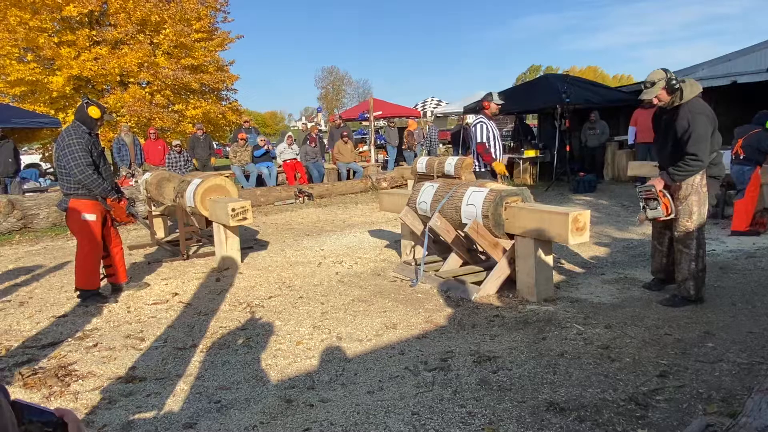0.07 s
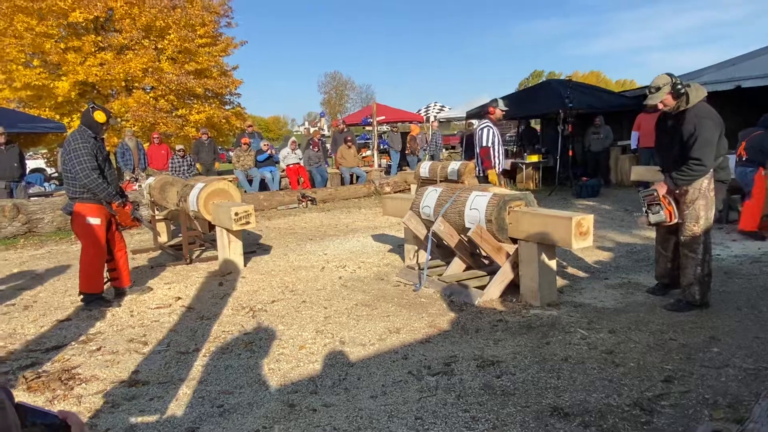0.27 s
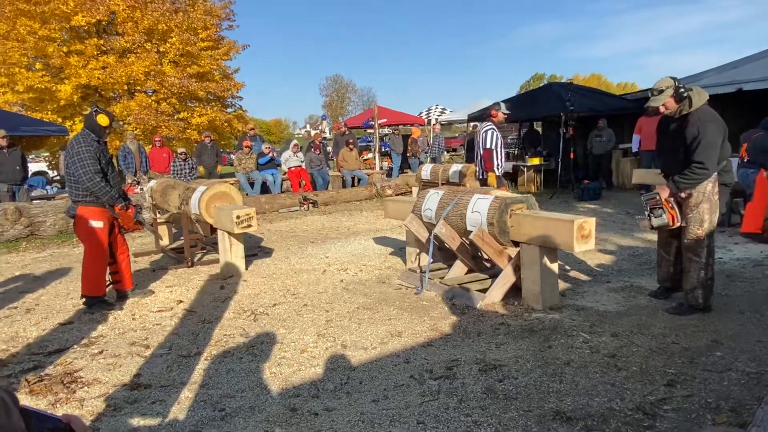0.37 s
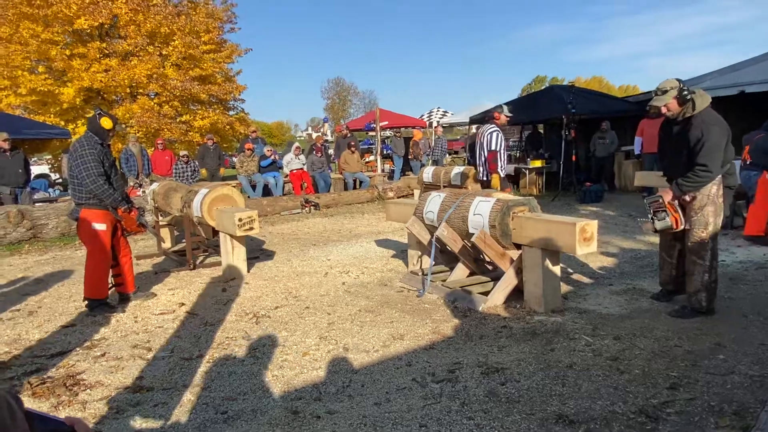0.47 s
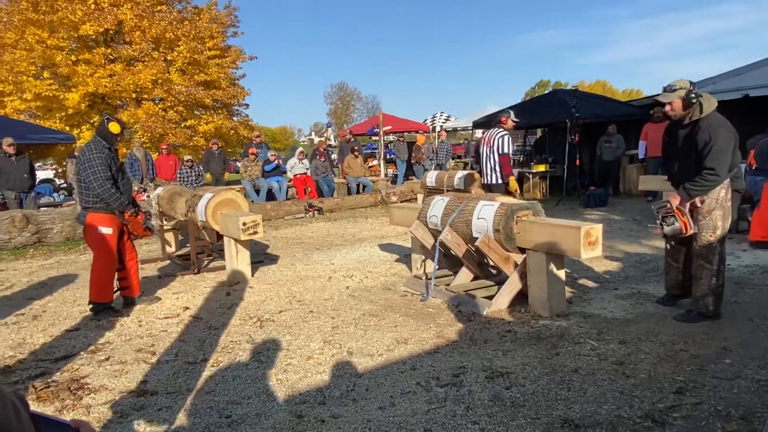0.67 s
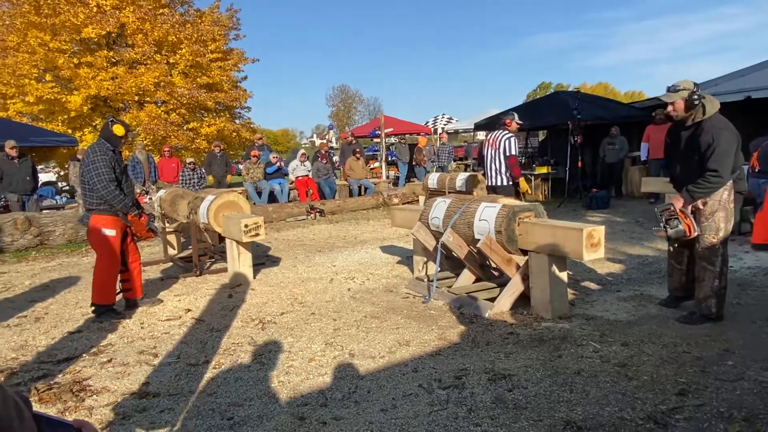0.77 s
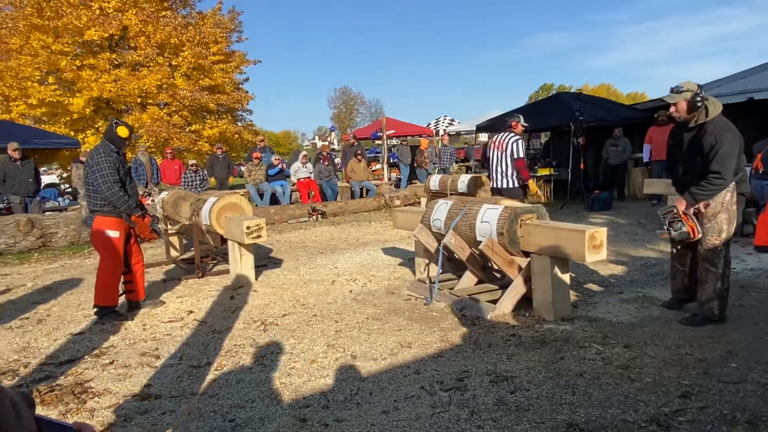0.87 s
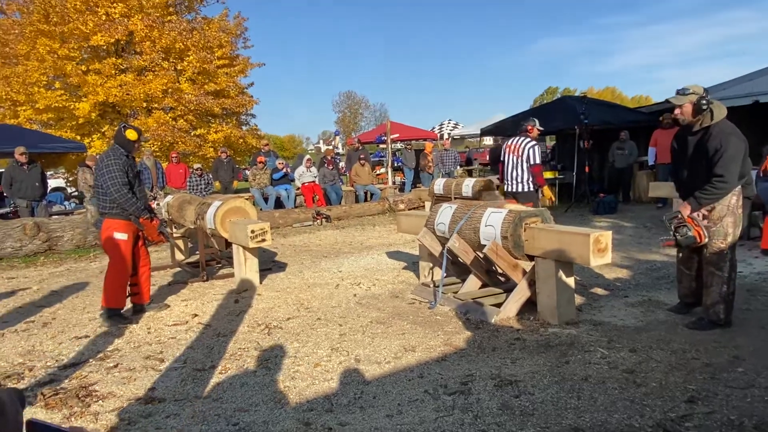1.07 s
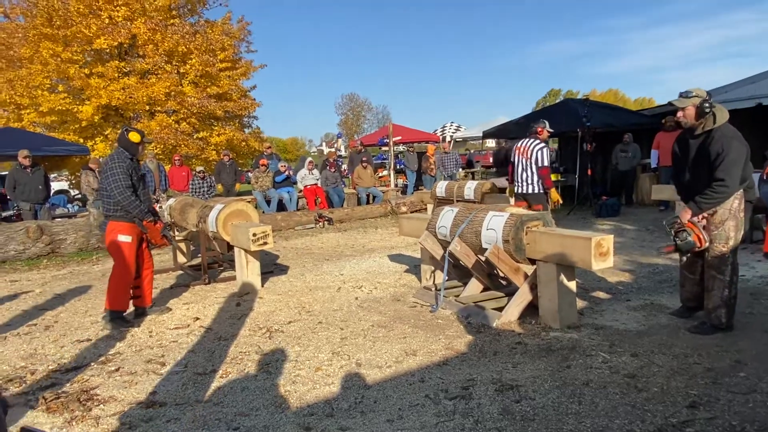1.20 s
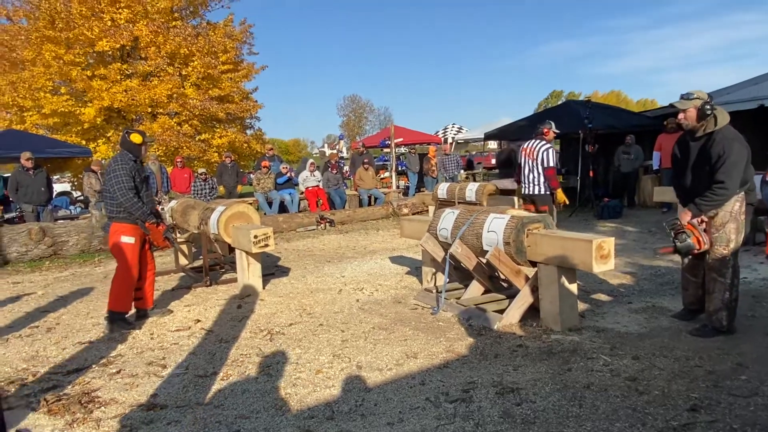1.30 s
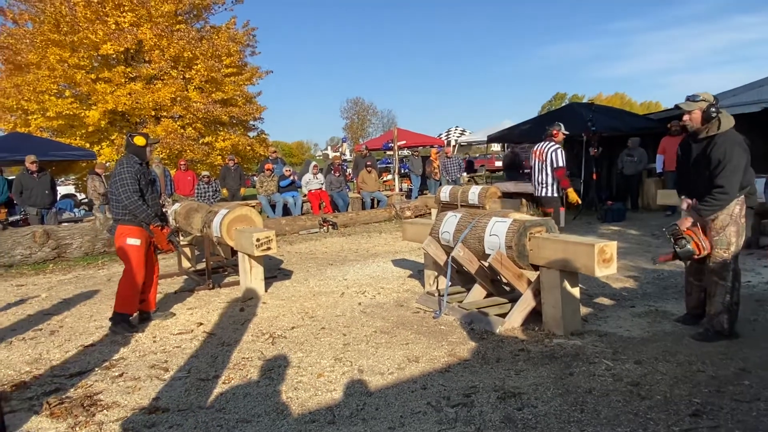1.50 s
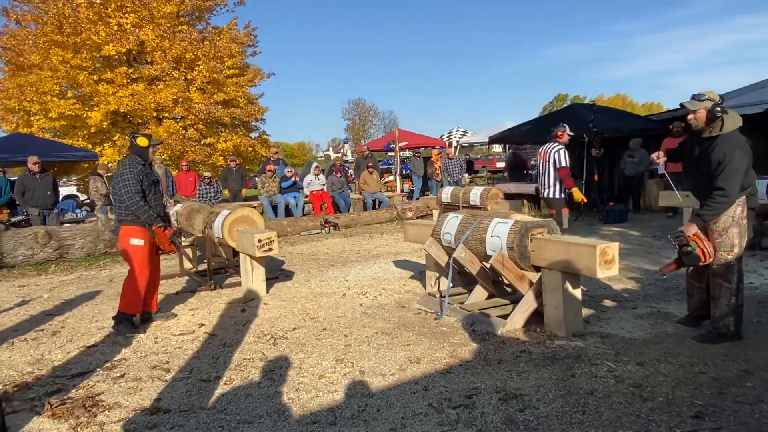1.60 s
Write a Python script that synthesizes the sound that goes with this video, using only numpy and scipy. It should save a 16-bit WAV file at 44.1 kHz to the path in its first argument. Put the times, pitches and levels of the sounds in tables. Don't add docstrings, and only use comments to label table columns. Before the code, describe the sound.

Outdoors, a chainsaw snarls up from idle to full speed, holds briefly, then coasts down quieter.

```python
import sys
import numpy as np
from scipy import signal
from scipy.fft import rfft, irfft, next_fast_len
from scipy.io import wavfile
from scipy.ndimage import uniform_filter1d

SR = 44100
rng = np.random.default_rng(int(sys.argv[2]) if len(sys.argv) > 2 else 0)


def pcm_store(signal):
    levels = np.round(np.clip(np.atleast_2d(signal), -1, 1) * 32767)
    wavfile.write(sys.argv[1], SR, levels.astype(np.int16).T)


def gain_from_db(level_db):
    decades = np.asarray(level_db, float) / 20
    return 10 ** decades


N = 72765

# (time [s], level [dB])
BREEZE_LEVEL = [
    (.07, -76),
    (.29, -81),
    (.4, -45.5),
    (.8, -46),
    (.95, -57),
    (1.15, -57.5),
    (1.35, -66),
    (1.65, -68),
]
# (frequency [Hz], level [dB])
BREEZE_COLOUR = [(20, -28), (45, -6), (80, 0), (120, -7), (170, -22), (400, -45)]
# (time [s], level [dB], frequency [Hz])
GUSTS = [
    (0.4, -50, 91),
    (0.503, -38, 109),
    (0.6, -41, 78.1),
    (0.689, -34, 120),
    (0.771, -56, 61.2),
    (0.839, -53, 44.54),
    (0.985, -41, 72),
    (1.152, -56, 88),
    (1.269, -54, 71.96),
    (1.579, -54, 103),
]
# (delay [s], level [dB])
ECHOES = [(.0045, -16), (.011, -17), (.023, -19), (.041, -22)]

# (time [s], crank speed [turns/s], exhaust [dB], weakness of every second firing [0-1], hiss [dB])
ENGINE = [(0.071, 80.4, -40.5, 0.4, -41), (0.124, 87.4, -35.5, 0.1, -38.5), (0.135, 89.3, -34.5, 0.6, -32),
          (0.164, 102.7, -20.5, 0.1, -31.5), (0.199, 130.7, -11, 0, -25.5), (.28, 172.7, -12.5, 0, -23),
          (.32, 190.1, -10.5, 1, -22.5), (0.459, 209.6, -14.5, 1, -20.5), (0.551, 218.4, -14.5, 1, -21),
          (0.649, 225.6, -14, 0.93, -26), (0.805, 232.7, -16, 1, -27), (0.829, 227.2, -26.5, 1, -29),
          (0.901, 210.6, -25.5, 0.5, -33.5), (1.012, 185.1, -25, 0.75, -32.5),
          (1.129, 164.7, -28, 0.9, -35), (1.301, 139.9, -30, 0.4, -40.5), (1.486, 114.7, -33, 0.67, -41),
          (1.65, 98.74, -29, 0.8, -38)]
# (time [s], extra scatter [dB])
STUMBLES = [(.31, 2.5), (.37, 3), (.51, 1.5), (.575, 1.2), (.615, 2.5), (.75, 2), (.81, 2.5), (.96, 1.5),
            (1.04, 2), (1.3, 1.2), (1.53, 1.5)]
# (time [s], level [dB])
POPS = [
    (.0925, -26),
    (.1285, -30),
    (1.6285, -24),
    (1.6325, -23),
    (1.6445, -26),
    (1.6472, -25),
]
# (frequency [Hz], width [Hz], level [dB])
POP_RING = [(745, 75, 0), (1330, 300, -8), (3450, 500, -25)]
# (frequency [Hz], width [Hz], level [dB])
HOT_MUFFLER = [(310, 370, -55), (546, 112, 4), (676.8, 98, 2.5), (763, 61.3, 3), (880, 51, 2.5),
               (1011, 48, -3.5), (1267, 60, -26), (1553, 69, -26), (2100, 1500, -23), (2690, 270, -58),
               (4270, 230, -49)]
# (frequency [Hz], width [Hz], level [dB])
COOL_MUFFLER = [(290, 24, -26), (587.6, 84.3, 2.5), (717, 96.6, 1.5), (928, 43, -12), (1460, 100, -24),
                (3130, 830, -34), (4520, 150, -21)]
# (frequency [Hz], width [Hz], level [dB])
PUMPING_MUFFLER = [(464.3, 150, 8.5), (605, 130, 10.5), (740, 135, 6), (968, 130, -3), (1360, 150, -11.5),
                   (1530, 530, -18), (2380, 90, -13), (2840, 710, -19.5), (3930, 72, -14)]
# (time [s], level [dB])
THROB = [(.15, -81), (.24, -37.5), (.45, -40.5), (.6, -26.5), (.7, -34.5), (.8, -43.5), (.84, -72),
         (1.65, -69)]
# (time [s], level [dB])
IDLE_LEVEL = [(.07, -36.5), (.12, -34.5), (.16, -43), (.2, -45), (1.45, -65.5), (1.55, -54.5), (1.65, -54)]
# (frequency [Hz], level [dB])
IDLE_COLOUR = [(70, -60), (120, -2), (220, -1.5), (350, 5.5), (600, -37.5)]
# (time [s], frequency [Hz], width [Hz], level [dB])
CLUTCH = [
    (0.1305, 4200, 348, -25.5),
    (0.13, 2380, 90, -35),
    (0.148, 2430, 90, -32),
]
# (multiple of crank speed, start [s], end [s], level [dB])
WHINES = [(5, .275, .33, -27), (4, .39, .49, -27), (4, .57, .82, -21), (6, .475, .605, -22),
          (7, .42, .81, -27), (9, .36, .56, -35), (9, .62, .8, -35), (10, .66, .8, -36), (16, .33, .8, -39),
          (6, .79, .95, -33), (7, .83, .93, -34), (7, .96, .99, -40), (2, .84, .95, -33),
          (16, .86, 1.04, -44), (11, 1.02, 1.06, -45), (6, 1.05, 1.21, -39), (9, 1.08, 1.16, -44),
          (23, 1.08, 1.11, -48), (14, 1.085, 1.11, -46), (12, 1.11, 1.17, -47), (7, 1.14, 1.3, -42),
          (16, 1.21, 1.25, -48), (3, 1.26, 1.36, -40)]
# (frequency [Hz], level [dB])
HISS_OPEN = [(900, 8.5), (1200, 6), (1900, 3), (3400, 4.5), (4400, 1), (5600, -4), (8700, -10),
             (10200, -25)]
# (frequency [Hz], level [dB])
HISS_SHUT = [(400, -5), (1000, -3), (1500, -0.5), (1850, -5.5), (2400, 0), (3500, -9), (5500, -12),
             (12000, -40)]
# (frequency [Hz], width [Hz], level [dB])
RATTLE = [(2660, 23, 0.5), (3206, 35, 2), (4200, 67, 4.5), (4455, 117, 4), (4683, 83, 1)]

# (frequency [Hz], phase [rad])
TURN = [(0, 0), (150, .9), (330, 4.1), (480, 4.5), (585, 4.9), (650, 3.4), (730, 4.6), (830, 5.25),
        (900, 6.45), (1080, 7.8), (1400, 9.4), (1600, 9.3), (1770, 8.5),
        (2500, 5.37), (3600, 5.19), (4700, 4.54), (5000, 5.66), (7150, 6.04), (7600, 5), (8300, 4),
             (8900, 7.5)]
# (frequency [Hz], level [dB])
RIGHT_GAIN = [(100, .3), (550, .5), (1100, -1), (1800, 0), (7800, 0), (8100, 13), (10300, 23), (12500, 8)]
# (frequency [Hz], likeness [0-1])
SAME = [(100, 0.45), (1800, 0.71), (2900, 0.81), (3600, 0.84), (5300, 0.23), (7500, 0.6), (9000, 0.75),
        (12000, 0.061)]
# (time [s], level [dB])
SHADE = [(.07, -10), (.25, -7.5), (.4, -5), (.62, -3.5), (.7, -1), (1.65, -1)]
# (start [s], end [s], low edge [Hz], high edge
# [Hz])
SIDE_SPELLS = [
    (.28, .41, 2920, 3150),
    (.48, .52, 2900, 3150),
    (.635, .72, 2950, 3250),
    (.87, .93, 3000, 3250),
    (1.17, 1.24, 3200, 3400),
    (1.28, 1.38, 3200, 3420),
    (1.44, 1.58, 3230, 3420),
    (.87, 1.64, 5040, 5200),
]

OPEN_S, SHUT_S, SWING_S = .128, .815, .025
STRENGTH_DB, JITTER_TURNS, COAST_SHARE = 1.0, .005, .3
STUMBLE_S = .02
WARM_S, WARMING_S = .35, .1
LOW_CUT_HZ, PUMP_CUT_HZ, HISS_CUT_HZ = 110, 400, 380
SMEAR_RAD, SMEAR_S = 1.0, .0031
GATE, GATE_TURNS, PATCH_DB = .42, .4, 1.1
RATTLE_DB = -7
WHINE_FADE_S, WAVER_DB = .03, 1.2
GUST_S = .021
PORT_DELAY_S, POP_LEFT_DB = 20 / 44100, -7.5
SHADE_HZ, SHADE_WIDTH_HZ, WIDE_SHADE = 610, 130, .4
ONLY_SIDE_HZ, ONLY_MID_HZ, JOIN_S = (5180, 5800), (6200, 7100), .16
START_S, EDGE_HZ, CEILING = .071, 12950, .95

t = np.arange(N) / SR


def evened(x):
    return x / np.sqrt(np.mean(x ** 2) + 1e-20)


def read(points, x):
    return np.interp(x, *np.transpose(points))


def drift(size):
    return evened(uniform_filter1d(rng.standard_normal(N), size=size))


def shape(x, gain):
    size = next_fast_len(N + 4096)
    return irfft(rfft(x, size) * gain(np.fft.rfftfreq(size, 1 / SR)), size)[..., :N]


def colour(x, points):
    hz, db = np.transpose(points)
    return evened(shape(x, lambda f: gain_from_db(np.interp(np.log(f + 1), np.log(hz), db))))


def ring(x, modes):
    def gain(f):
        rings = 0
        for k, (hz, width, db) in enumerate(modes):
            rings = rings + (-1) ** k * gain_from_db(db) * 1j * f * width / (hz ** 2 - f ** 2 + 1j * f * width)
        return rings * (1j * f / (LOW_CUT_HZ + 1j * f)) ** 4
    return shape(x, gain)


def steady(x):
    power = uniform_filter1d(uniform_filter1d(x ** 2, size=5000), size=5000)
    return x / np.sqrt(power + 1e-9)


def steep(x, hz):
    return shape(x, lambda f: 1 / np.sqrt(1 + (hz / (f + 1)) ** 12))


def smear(x):
    def gain(f):
        angle = 2 * np.pi * f * SMEAR_S
        return np.exp(1j * SMEAR_RAD * (np.cos(angle) + np.sin(angle * .62)))
    return shape(x, gain)


def breeze():
    smooth = uniform_filter1d(uniform_filter1d(rng.standard_normal(N), size=2000), size=2000)
    lumps = gain_from_db(2 * evened(smooth))
    wind = gain_from_db(read(BREEZE_LEVEL, t)) * evened(lumps * colour(rng.standard_normal(N), BREEZE_COLOUR))
    for at, db, hz in GUSTS:
        wind += gain_from_db(db) * np.exp(-((t - at) / GUST_S) ** 2) * np.sin(2 * np.pi * hz * (t - at))
    return wind


def echoes(x):
    taps = np.zeros(SR // 10)
    for delay, db in ECHOES:
        taps[int(delay * SR)] = gain_from_db(db)
    return x + signal.oaconvolve(x, taps)[:N]


def throttle():
    opening = np.clip((t - OPEN_S) / SWING_S + 1, 0, 1)
    return opening * np.clip((SHUT_S - t) / SWING_S + .5, 0, 1)


def crank(gas):
    times, speeds, _, weakness, _ = np.transpose(ENGINE)
    hz, weak = np.interp(t, times, speeds), np.interp(t, times, weakness)
    turns = np.cumsum(uniform_filter1d(hz, size=900)) / SR
    turns -= turns[int(OPEN_S * SR)] % 1
    count = np.floor(turns).astype(int) + 1
    draw = rng.standard_normal((400, 2))
    scatter_db = STRENGTH_DB * (COAST_SHARE + (1 - COAST_SHARE) * gas) * np.clip(t / WARM_S, 0, 1)
    for at, db in STUMBLES:
        scatter_db = scatter_db + db * np.exp(-((t - at) / STUMBLE_S) ** 2)
    weakened = np.clip(weak, 0, .95) * np.maximum(gas, .15) * (count % 2)
    strength = gain_from_db(scatter_db * draw[count, 0]) * (1 - weakened)
    hit = np.flatnonzero(np.diff(count)) + 1
    late = (JITTER_TURNS * gas[hit] * draw[count[hit], 1] * SR / hz[hit]).astype(int)
    pulses = np.zeros(N)
    pulses[np.clip(hit + late, 0, N - 1)] = strength[hit]
    return turns, strength, pulses


def clutch():
    out = np.zeros(N)
    for at, hz, width, db in CLUTCH:
        age = np.maximum(t - at, 0)
        out += gain_from_db(db - 18 * width * age) * np.sin(2 * np.pi * hz * age)
    return out


def body(turns):
    throb = gain_from_db(read(THROB, t)) * np.sin(2 * np.pi * turns)
    return throb + gain_from_db(read(IDLE_LEVEL, t)) * colour(rng.standard_normal(N), IDLE_COLOUR)


def shaft_whines(turns):
    out = np.zeros(N)
    for multiple, start, end, db in WHINES:
        waver = gain_from_db(WAVER_DB * drift(1500))
        spell = np.clip(np.minimum(t - start, end - t) / WHINE_FADE_S + .5, 0, 1)
        out += gain_from_db(db) * spell * waver * np.sin(2 * np.pi * np.round(multiple) * turns)
    return out


def hiss(gas, turns, strength, pops):
    times, _, _, _, hiss_db = np.transpose(ENGINE)
    level = gain_from_db(np.interp(t, times, hiss_db))
    gate = (1 - GATE) + GATE * 2 * np.sqrt(strength) * np.exp(-(turns % 1) / GATE_TURNS)
    noise = rng.standard_normal((2, N)) * gate * gain_from_db(PATCH_DB * drift(300))
    rattle = gain_from_db(RATTLE_DB) * evened(ring(noise, RATTLE))
    air = level * (gas * (colour(noise, HISS_OPEN) + rattle) + (1 - gas) * colour(noise, HISS_SHUT))
    burst = signal.oaconvolve(pops, np.exp(-np.arange(900) / 200.))[:N] * .025
    return steep(air + burst * colour(rng.standard_normal((2, N)), HISS_SHUT), HISS_CUT_HZ)


def lone_pops():
    pops = np.zeros(N)
    for at, db in POPS:
        pops[int(at * SR)] = gain_from_db(db) * 9
    return pops


def exhaust(gas, pulses):
    times, _, level_db, _, _ = np.transpose(ENGINE)
    level = gain_from_db(np.interp(t, times, level_db))
    warm = np.clip((t - WARM_S) / WARMING_S + .5, 0, 1)
    shut = (1 - gas) * (t > WARM_S)
    hot = steady(smear(ring(pulses, HOT_MUFFLER)))
    cool = steady(ring(pulses, COOL_MUFFLER))
    pumping = steady(smear(steep(ring(pulses, PUMPING_MUFFLER), PUMP_CUT_HZ)))
    return level * ((1 - shut) * (warm * hot + (1 - warm) * cool) + shut * pumping)


def scene():
    gas = throttle()
    turns, strength, pulses = crank(gas)
    pops = lone_pops()
    wind, air = breeze(), hiss(gas, turns, strength, pops)
    tone = echoes(exhaust(gas, pulses) + clutch() + body(turns) + shaft_whines(turns))
    popping = ring(pops, POP_RING) * 9

    def same(f):
        return np.clip(read(SAME, f), 0, 1)

    def port(f):
        turn = read(TURN, f) - 2 * np.pi * f * PORT_DELAY_S
        return gain_from_db(read(RIGHT_GAIN, f)) * np.exp(1j * turn)

    right_air = shape(air[0], same) + shape(air[1], lambda f: np.sqrt(1 - same(f) ** 2))
    right = shape(tone + wind + right_air, port) + popping
    shaded = shape(tone, lambda f: np.exp(-((f - SHADE_HZ) / SHADE_WIDTH_HZ) ** 2))
    shade_db = read(SHADE, t)
    left = (tone + (gain_from_db(shade_db) - 1) * shaded + air[0]) * gain_from_db(WIDE_SHADE * shade_db) + wind
    return np.array([left + gain_from_db(POP_LEFT_DB) * popping, right])


def band(x, edges):
    low, high = edges
    return shape(x, lambda f: 1. * (f > low) * (f < high)) * np.clip((t - JOIN_S) / .06, 0, 1)


def band_limit(x):
    return signal.sosfilt(signal.butter(12, 12930, fs=SR, output="sos"), x)


def record(dry):
    x = shape(dry, lambda f: 1 / (1 + (f / EDGE_HZ) ** 24))
    mid, side = (x[0] + x[1]) / 2, (x[0] - x[1]) / 2
    mid, side = mid - band(mid, ONLY_SIDE_HZ), side - band(side, ONLY_MID_HZ)
    for start, end, low, high in SIDE_SPELLS:
        mid = mid - band(mid, (low, high)) * np.clip(np.minimum(t - start, end - t) / .01, 0, 1)
    mix = np.array([mid + side, mid - side]) * np.clip((t - START_S) / .00055, 0, 1)
    mix = mix / (1 + (mix / CEILING) ** 6) ** (1 / 6)
    return band_limit(mix)


dry = scene()
out = record(dry)
pcm_store(out)
```